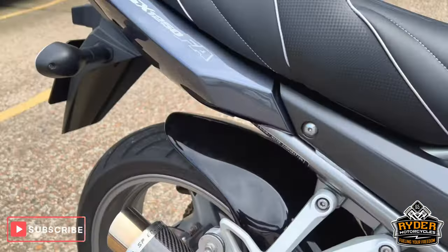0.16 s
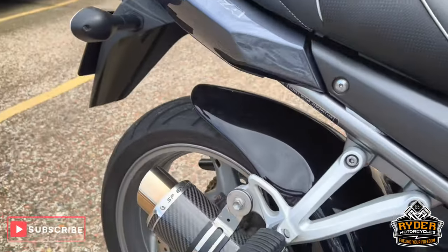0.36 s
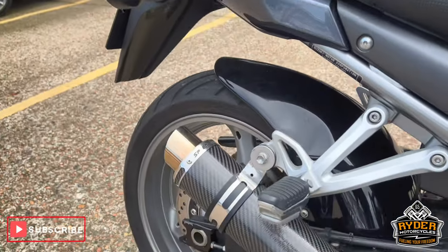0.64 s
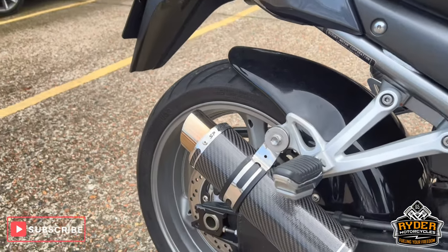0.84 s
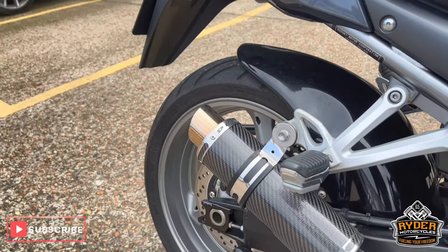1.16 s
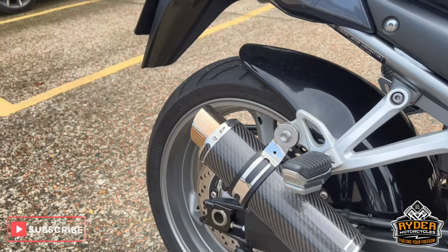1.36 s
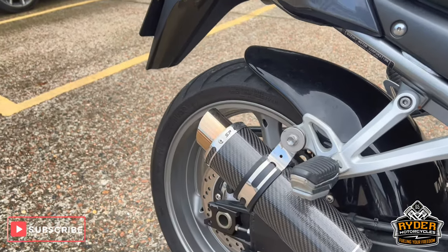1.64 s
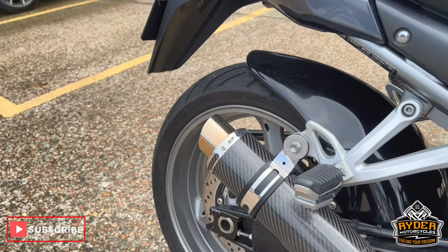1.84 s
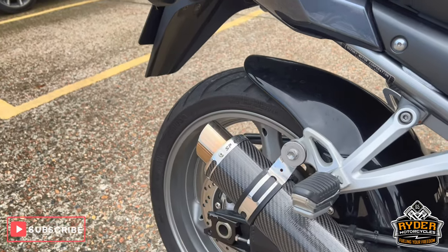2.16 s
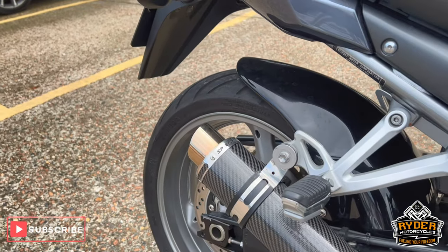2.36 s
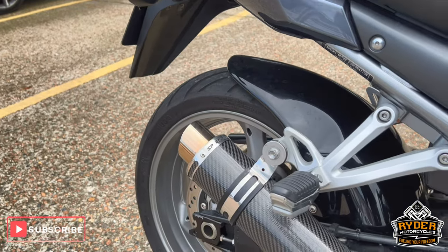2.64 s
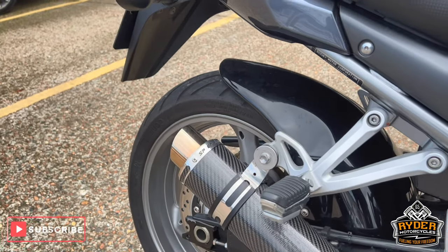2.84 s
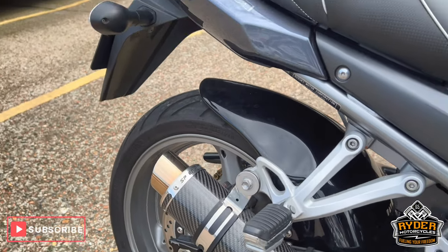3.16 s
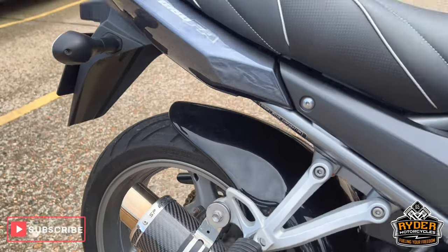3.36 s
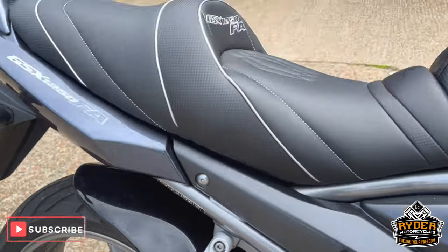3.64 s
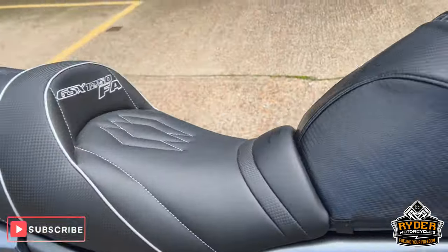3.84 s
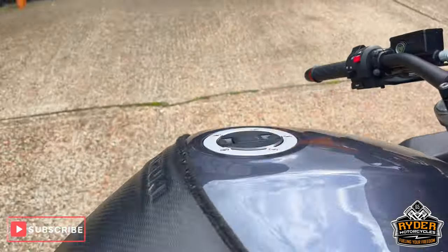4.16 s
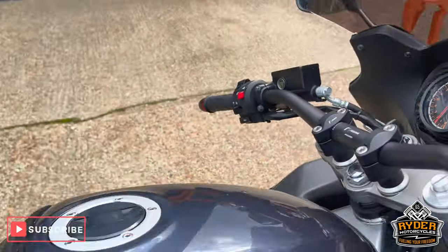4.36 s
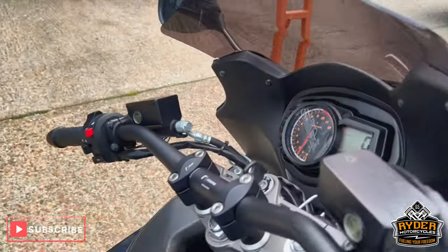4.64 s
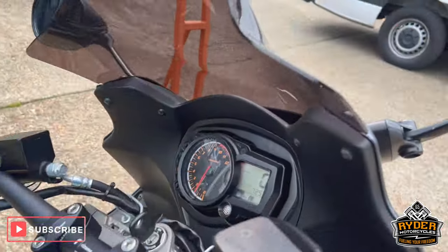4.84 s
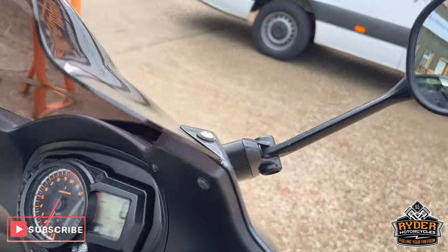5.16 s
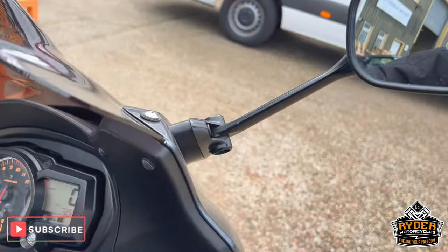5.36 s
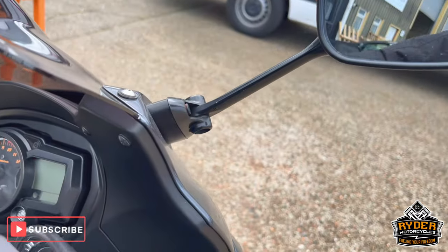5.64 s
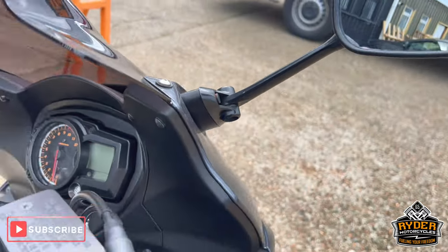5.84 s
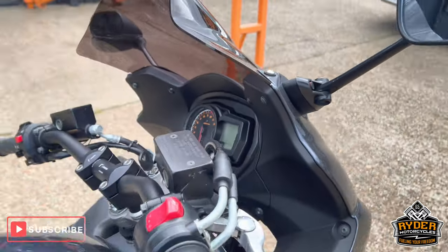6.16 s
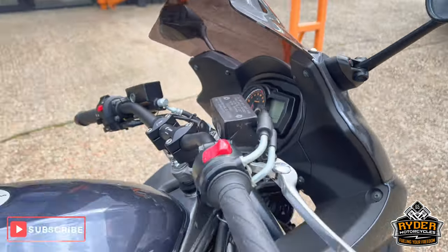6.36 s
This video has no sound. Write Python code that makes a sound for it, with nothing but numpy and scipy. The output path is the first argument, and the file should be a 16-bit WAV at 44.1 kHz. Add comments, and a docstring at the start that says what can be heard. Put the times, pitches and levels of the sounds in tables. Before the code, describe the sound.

A phone held outdoors beside a motorcycle silencer hears a low, slightly uneven four-cylinder idle, with fine valve ticking and chain noise. From 0 to 0.9 s wind rumbles and slaps the microphone. At 1.3 s the throttle snaps open: a fast rising, raspy bark to 1.5 s, with one tiny stumble, then dull thuds and a round pumping note gliding down with gear chirps. Gusts buffet again from 1.9 to 2.6 s as it settles. At 2.7 s a second, slightly higher blip barks until 2.9 s, thuds and runs down towards idle by about 4.5 s. Around 3.9-4.1 s soft air swishes accompany the move forward; the exhaust turns distant and bassy. Wind flutters at 5-5.5 s. At 5.5 s the engine stops almost instantly. Clicks and dull bumps cluster until 6 s, with a faint tiny motor whine near 5.9-6.05 s, then near quiet and a final click and bump at 6.4 s.

```python
"""Outdoors, a phone held close beside the silencer of a four-cylinder motorcycle hears it idle in gusty wind.
Firing pulses ring exhaust resonances, noise and ticks make the valve train, tones locked to speed the gears.
Two blips of the throttle each bark, then run down to idle with thuds and a round pumping note.
The phone then swings forward to the handlebar with soft swishes, and the engine falls silent.
Last come clicks, bumps and a faint motor; shaped noise makes the wind throughout and the quiet yard behind."""
import sys
import numpy as np
from scipy import signal
from scipy.fft import rfft, irfft, next_fast_len
from scipy.io import wavfile
from scipy.ndimage import uniform_filter1d

SR = 44100
rng = np.random.default_rng(int(sys.argv[2]) if len(sys.argv) > 2 else 0)


def master_out(mix):
    """Clip the mix to full scale and print it as 16-bit PCM to the path in sys.argv[1]."""
    frames = np.transpose(np.atleast_2d(mix))
    ceiling = np.clip(frames, -1, 1)
    pcm = np.round(ceiling * 32767).astype(np.int16)
    wavfile.write(sys.argv[1], SR, pcm)


N = 286209
T = np.arange(N) / SR  # seconds

ENGINE_OFF_S = 5.5


def engine():
    """All engine sounds follow one crankshaft, whose speed hunts a little."""
    hz = speed() + .6 * walk(25)
    turns = .6 + np.cumsum(hz) / SR  # firing phase, one whole turn per firing
    age = turns % 1 / hz  # seconds since the last firing
    stopped = np.maximum(T - ENGINE_OFF_S, 0)
    exhaust_fade = np.exp(-stopped / 0.0057)
    machine_fade = np.exp(-stopped / 0.035)
    return exhaust(turns, hz, age) * exhaust_fade + machinery(turns, hz, age) * machine_fade


# Twists of the throttle. Each row: opens in seconds, shuts in seconds, firing rate aimed for in Hz,
# bark under load in dB, bark just after shutting in dB.
BLIPS = [(1.314, 1.507, 168.8, -10.5, -23.5), (2.731, 2.918, 191.8, -10, -22)]
# Idle speed. Each row: time in seconds, firings per second in Hz.
IDLE = [(0, 40.13), (1, 39.18), (1.3, 40.99), (2.4, 39.48), (2.7, 40.8), (4.8, 37.54)]
COAST_S, FLYWHEEL_S = .8, .04  # time constant of the run-down; smoothing of changes in speed
FRICTION_HZ = 45  # steady friction, as the speed at which drag would equal it
# the idle control holds the speed up for a moment at a set delay after each blip
CATCH_HZ, CATCH_DELAY_S, CATCH_WIDTH_S = 11.5, .79, .28


def speed():
    """Firing rate: a steady climb on open throttle, then drag and friction slow it back to idle."""
    idle, revs, catch = curve(IDLE), 0, 0
    for opens, shuts, peak_hz, _, _ in BLIPS:
        climb = (idle + (peak_hz - idle) * ramp(opens, shuts - opens)) * (T > opens)
        run_down = np.exp(-np.maximum(T - shuts, 0) / COAST_S)
        revs = np.maximum(revs, (climb + FRICTION_HZ) * run_down - FRICTION_HZ)
        catch = catch + CATCH_HZ * swell(shuts + CATCH_DELAY_S, CATCH_WIDTH_S)
    # a smooth maximum of idle and revs
    caught = ((idle + catch) ** 8 + revs ** 8) ** (1 / 8)
    return uniform_filter1d(caught, int(FLYWHEEL_S * SR))


MISFIRE_S, MISFIRE_WIDTH_S, MISFIRE_DB = 1.5, 0.0052, -16  # one charge fails to burn in the first blip


def exhaust(turns, hz, age):
    """The outlet gives a soft boom, a hard bark on the throttle and a ringing pipe on the run-down."""
    # share of the sound in which pumping replaces firing
    above_idle = np.clip((hz - 43) / (57 - 43), 0, 1)
    overrun = .88 * np.clip(coasting(), 0, 1) * above_idle
    boom = undb(-2.0) * soft_boom(turns, hz, age, overrun) * boom_gain(hz)
    bark = hard_bark(turns, hz, age, overrun) * bark_gain(hz)
    misfire = undb(MISFIRE_DB * swell(MISFIRE_S, MISFIRE_WIDTH_S))
    return (boom + bark + pipe_ring(hz, age)) * misfire


# Silencer resonances under soft pulses. Each row: centre in Hz, width in Hz, relative level in dB.
SILENCER = [(77, 10.4, 1), (117.3, 20.5, 0.5), (198.7, 49.5, -4), (300.6, 104, -10.5), (500, 130, -21.5),
            (1120, 290, -34)]


def soft_boom(turns, hz, age, overrun):
    """Soft pulses and gas turbulence ring the silencer, and pumping replaces them on the overrun."""
    turbulence = undb(-9 - 7 * throttle()) * noise() * (1 + np.exp(-age / .004)) * np.sqrt(hz / SR)
    drive = firings(turns, scatter_db=1.3, jitter=.024) + turbulence
    boom = 0
    for k, (centre, width, db) in enumerate(SILENCER):
        boom = boom + undb(db) * resonate(drive, centre, width) * (-1) ** k
    boom = colour(boom, [(22, -60.5), (45, 20.5), (70, 1), (450, -2.5), (900, -4.5), (3000, -8.5)])
    # further forward the bike shades the outlet: the pulses arrive by detours, rounded and mostly bass
    shaded = colour(boom, [(160, -0.5), (280, -2), (400, -5.5), (600, -15), (1200, -4.5)])
    shaded = disperse(disperse(shaded, hz=290, width_hz=55), hz=400, width_hz=80)
    shade = np.clip(2 * forward_place(), 0, 1)
    boom = (1 - shade) * disperse(boom, hz=354, width_hz=125) + shade * shaded
    return (1 - overrun) * steady(boom, turns) + overrun * pumping(turns, hz)


# Spectrum of the hard pulses. Each row: frequency in Hz, relative level in dB.
BARK = [(60, -29), (150, -14.5), (240, 1.5), (320, 8), (480, 1.5), (590, -11), (700, -6), (950, -19.5),
        (1130, -9.5), (1400, -22), (2000, -26.5), (3000, -25), (6000, -56), (12000, -47)]


def hard_bark(turns, hz, age, overrun):
    """Hard pulses, each followed by a jet of gas, which keep only a raspy top on the overrun."""
    pulses = colour(firings(turns, scatter_db=1, jitter=.0015), BARK)
    hard = steady(brighten(disperse(pulses, hz=307, width_hz=380), hz), turns)
    jet = colour(noise() * np.exp(-age / 0.0029), BARK)
    jet = colour(jet, [(300, -8.0), (1000, -3.0), (4000, 1.0)])
    jet_share = undb(-20 + 15 * overrun)
    bark = (hard + jet_share * steady(jet, turns)) / np.hypot(1, jet_share)
    rasp = colour(bark, [(350, -18), (600, -7), (900, 0)])
    # near the top of a blip the pulses steepen into a brassy edge
    edge = colour(hard, [(600, -35), (1100, -13), (1550, -1), (2200, 1), (3200, -12), (5000, -25)])
    edge_share = throttle() * np.clip((hz - 90) / 60, 0, 1)
    return (1 - overrun) * bark + overrun * rasp + edge_share * edge


def pipe_ring(hz, age):
    """Gas keeps ringing one pipe resonance as the engine slows."""
    ring = unit(resonate(noise() * np.exp(-age / 0.008), 1230, 150))
    return ring * undb(-47.0 + 10 * np.log2(hz / 150)) * coasting() * (1 - forward_place())


# Pumping harmonics on a shut throttle. Each row: multiple of the firing rate, relative level in dB.
PUMPING = [(1, 3), (2, -13), (3, -15.5), (4, -21), (5, -26), (6, -33), (7, -26.5)]
# Gain of the pipe those harmonics glide through. Each row: frequency in Hz, gain in dB.
PIPE = [(50, -1.5), (100, -1.5), (175, 0), (225, -6), (245, -4), (275, 8), (325, 6), (365, -3), (430, -1),
        (490, 3), (570, -9), (680, -5), (900, -15)]


def pumping(turns, hz, db=-1):
    """On a shut throttle the pistons mostly pump air: a round, uneven gliding note over rushing gas."""
    note = 0
    for k, level_db in PUMPING:
        level = undb(level_db + across(PIPE, k * hz) + 1.8 * walk(18))
        note = note + level * np.cos(2 * np.pi * k * turns)
    uneven = 1 + .08 * np.cos(np.pi * turns / 2) + .11 * walk(150)
    gas = colour(noise(), [(30, -30), (60, -3), (150, 0), (320, 0), (520, -7), (750, -20), (1500, -40)])
    return undb(db) * (note * uneven + undb(-16) * unit(gas))


# Strength of each cylinder. Listed in firing order: relative level in dB.
CYLINDERS = [-2.2, -1, -1.5, -3.8]


def firings(turns, scatter_db, jitter):
    """One pulse per whole turn of firing phase, with random strength and a shift in shares of a period."""
    place = np.interp(np.arange(1, int(turns[-1])), turns, np.arange(N))
    count = len(place)
    size = undb(np.resize(CYLINDERS, count) + scatter_db * noise()[:count])
    place = np.clip(place + jitter * np.gradient(place) * noise()[:count], 0, N - 1)
    # share each pulse between two samples, so that it can fall between them
    pulses, sample = np.zeros(N + 1), place.astype(int)
    pulses[sample] += size * (1 - place % 1)
    pulses[sample + 1] += size * (place % 1)
    return pulses[:N]


def steady(x, turns, count=3):
    """Hold the rms near 1 over a few firings, so that the gains set the loudness."""
    energy = np.cumsum(x ** 2)
    start = np.interp(turns - count / 2, turns, np.arange(N))
    end = np.interp(turns + count / 2, turns, np.arange(N))
    power = (energy[end.astype(int)] - energy[start.astype(int)]) / (end - start)
    return x / np.sqrt(power + np.mean(x ** 2) / 10 ** 2)


def brighten(x, hz, dull_hz=80, bright_hz=165):
    """Pulses steepen as the engine speeds up, so the treble grows."""
    steep = np.clip((hz - dull_hz) / (bright_hz - dull_hz), 0, 1)
    dull = colour(x, [(450, 6.5), (1000, -5.5), (2500, -9.0)])
    bright = colour(x, [(300, 1.5), (500, 7.5), (900, 8.5), (1600, 9.5), (2600, -5.5), (4000, 1.0)])
    return (1 - steep) * dull + steep * bright


def disperse(x, hz, width_hz):
    """All-pass: a pipe holds back the sound near its resonance, which spreads pulses into short rings."""
    return x - 2 * resonate(x, hz, width_hz)


# Spectrum of chains, valves and rushing gas. Each row: frequency in Hz, relative level in dB.
MACHINE = [(200, 12.5), (600, 11.5), (1100, 9.5), (1700, 4.5), (2300, 1), (3300, 0.5), (4200, -3.5),
           (5500, -6), (7300, -7), (8800, -5), (9600, -10), (10300, -29.5), (12000, -18), (15500, -37)]


def machinery(turns, hz, age):
    """Chain and gas noise swell with each firing, valves tick, and the gears whine along with the speed."""
    forward = forward_place()
    rush = noise() * (1 + .8 * np.exp(-age / 0.0043)) * undb(1.54 * walk(70))
    rush = unit(colour(rush, MACHINE))
    # further forward the tank hides the valves, and the gears and chains come closer
    ticks = noise() * np.exp(-age / .004) * undb(4 * np.tanh(walk(45)))
    ticks = resonate(resonate(ticks, 3180, 750), 3200, 2200)
    valve_db = 3 - 40 * forward - 5 * coasting() - 10 * gulp()
    valves = unit(ticks) * np.clip(45 / hz, 0, 1) * undb(valve_db)
    chains = undb(-1 + 6.2 * np.tanh(walk(25))) * forward * unit(resonate(rush, 2100, 650))
    rush = undb(11.0 + 1.0 * forward) * rush
    return (rush + valves + chains + gear_whine(turns, hz, forward)) * machine_gain(hz)


# Gear whine. Each row: multiple of the firing rate, relative level in dB.
GEARS = [(54, -0.5), (80, -14), (133, -5.5)]
# How well the engine cases radiate the whine. Each row: frequency in Hz, gain in dB.
CASES = [(1500, -10), (2100, -3), (2900, 1), (3800, -1), (5000, -10), (6500, -11), (8000, -24),
         (12000, -45)]


def gear_whine(turns, hz, forward):
    """Gear teeth sing at multiples of the firing rate, most in broken chirps as the engine settles."""
    tones = 0
    for multiple, db in GEARS:
        flutter = undb(7.5 * np.tanh(walk(35)))
        tones = tones + undb(db) * flutter * np.sin(2 * np.pi * multiple * turns + 1.6 * walk(200))
    settling = coasting() * near(hz, centre_hz=62, width=.28)
    chirps = 7 * np.tanh(2 * walk(30) - 1)
    closeness_db = 6 * np.clip(4 * forward, 0, 1)
    level_db = -1 + closeness_db - 2 * octaves(hz) + (2 + chirps) * settling - 14 * gulp()
    return colour(tones, CASES) * undb(level_db)


# The phone's place along the bike. Each row: time in seconds, place from 0 at the silencer
# to 1 at the handlebar.
FORWARD = [(3.3, 0.012), (4.3, 0.4)]


def forward_place():
    """How far forward the phone is held."""
    return np.clip(curve(FORWARD), 0, 1)


BARK_ATTACK_S, BARK_RELEASE_S, BARK_DB_PER_OCTAVE = 0.035, 0.01, 15.5


def throttle():
    """1 while the throttle is open, 0 while it is shut."""
    return sum(ramp(opens, BARK_ATTACK_S) - shutting(shuts) for opens, shuts, *_ in BLIPS)


def shutting(shuts):
    """Rises from 0 to 1 as the throttle shuts."""
    return ramp(shuts - BARK_RELEASE_S / 2, BARK_RELEASE_S)


GULP_DELAY_S, GULP_WIDTH_S = 0.026, 0.058


def gulp():
    """The first surge of charge just after each opening."""
    return sum(swell(opens + GULP_DELAY_S, GULP_WIDTH_S) for opens, *_ in BLIPS)


def coasting(length_s=1.15):
    """1 for a set time after each shutting, while the engine runs down."""
    return sum(ramp(shuts, 0.072) - ramp(shuts + length_s, 0.028) for _, shuts, *_ in BLIPS)


def octaves(hz):
    """Engine speed in octaves above idle."""
    return np.log2(hz / curve(IDLE))


def near(hz, centre_hz, width):
    """1 as the engine passes through a given speed; width in octaves."""
    return np.exp(-(np.log2(hz / centre_hz) / width) ** 2)


# Engine at the phone, reckoned at idle speed. Each row: time in seconds, exhaust boom gain in dB,
# mechanical noise gain in dB.
ENGINE = [(0, -13, -51), (1.25, -15.5, -52.5), (2.05, -12.5, -58.5), (2.4, -25.5, -59), (2.7, -19.5, -56),
          (3.35, -13, -57), (3.6, -20, -62.5), (4.2, -29, -63.5), (5.1, -28.5, -63.5)]
BOOM_DB_PER_OCTAVE, MACHINE_DB_PER_OCTAVE = 3, 5
CUT_WIDTH_S, CUT_DB = 0.019, -11


def boom_gain(hz, gulp_db=6):
    """The boom grows a little with speed, surges on opening and collapses on shutting."""
    cut = sum(swell(shuts, CUT_WIDTH_S) for _, shuts, *_ in BLIPS)
    return undb(curve(ENGINE) + BOOM_DB_PER_OCTAVE * octaves(hz) + gulp_db * gulp() + CUT_DB * cut)


def bark_gain(hz, linger_s=0.53, sag_db=-5, sag_s=0.0092):
    """The bark is full under load, sags as the grip is let go, then a weaker one dies with the speed."""
    gain = 0
    for opens, shuts, peak_hz, load_db, coast_db in BLIPS:
        shut = shutting(shuts)
        loaded = ramp(opens, BARK_ATTACK_S) ** 2 * undb(load_db + sag_db * swell(shuts, sag_s))
        after = undb(coast_db + BARK_DB_PER_OCTAVE * np.log2(hz / peak_hz))
        after = after * (1 - ramp(shuts + linger_s, 0.059))
        gain = gain + (1 - shut) * loaded + shut * after
    return gain


def machine_gain(hz, gulp_db=13, load_db=3, rattle_db=4.0):
    """Mechanical noise grows with speed and load, hisses on opening and rattles at one coasting speed."""
    rattle = coasting() * near(hz, centre_hz=111.4, width=0.055)
    level_db = curve(ENGINE, axis=2) + MACHINE_DB_PER_OCTAVE * octaves(hz)
    return undb(level_db + gulp_db * gulp() + load_db * throttle() + rattle_db * rattle)


# Dull thuds as the throttle snaps shut. Each row: start in seconds, relative level in dB.
THUDS = [(1.562, -19), (1.63, -8), (2.945, -14)]


def thuds(hz=105):
    """Late-burning mixture thumps in the silencer, as short decaying sines."""
    return sum(undb(db) * burst(s, decay_s=0.011) * np.sin(2 * np.pi * hz * (T - s)) for s, db in THUDS)


# Small clicks and knocks at the handlebar. Each row: start in seconds, relative level in dB,
# centre in Hz, rattle decay in seconds, relative level of the knock on the panel in dB.
CLICKS = [(5.564, -36, 1090, 0.0033, -26), (5.590, -43, 1400, 0.00075, -18),
          (5.600, -24, 2220, 0.00043, -23), (5.624, -39, 1800, .001, -22), (5.63, -34, 1490, 0.0009, -31),
          (5.65, -25, 1400, 0.0042, -27), (5.659, -34, 2170, .0015, -34), (5.676, -38.5, 5260, .007, -25.5),
          (5.709, -44, 3200, 0.0035, -38), (5.746, -50, 3530, 0.0044, -24.5),
          (5.751, -36, 3850, 0.00066, -23), (5.942, -48, 1290, .002, -43), (5.965, -33, 1310, 0.0033, -45),
          (5.975, -49, 1360, 0.0034, -25), (5.984, -34.5, 1250, 0.0024, -29),
          (5.999, -37, 1350, 0.0015, -37), (6.242, -49, 6000, .001, -65),
          (6.416, -26.5, 1300, 0.0009, -20.5), (6.4204, -43, 1270, .0005, -19)]


def clicks(size=4096):
    """Hard parts click: a sharp contact, a short rattle and a knock on the panel that holds them."""
    out = np.zeros(N + size)
    for s, db, hz, decay_s, panel_db in CLICKS:
        rattle = rng.standard_normal(size) * np.exp(-T[:size] / decay_s)
        strike = signal.unit_impulse(size) + .3 * rattle
        tick = resonate(resonate(strike, hz, .9 * hz), hz, .9 * hz)
        panel = resonate(resonate(strike, 500, 200), 560, 600)
        contact = signal.butter(3, min(1.7 * hz, SR / 4), fs=SR)  # low-pass
        tick = undb(db) * peak(signal.lfilter(*contact, tick))
        knock = undb(panel_db) * peak(signal.lfilter(*contact, panel))
        out[int(s * SR):][:size] += tick + knock
    return colour(out[:N], [(7500, -4), (10000, -20)])


# A small electric motor winding after the stop. Each row: time in seconds, fundamental in Hz,
# relative level in dB.
MOTOR = [(5.9, 1900, -75), (6.01, 1900, -69), (6.03, 1950, -73)]


def motor():
    """Faint whine of a small motor, on its second to fourth harmonics."""
    phase = 2 * np.pi * np.cumsum(curve(MOTOR) * (1 + 0.0049 * walk(150))) / SR
    tone = sum(undb(-7 * (k - 0.5)) * np.sin(k * phase) for k in range(2, 5))
    running = ramp(MOTOR[0][0], .01) - ramp(MOTOR[-1][0], 0.043)
    return tone * running * undb(curve(MOTOR, axis=2))


# Dull bumps of the hand on the phone. Each row: start in seconds, relative level in dB.
BUMPS = [(5.679, -22), (5.75, -21.5), (6.003, -31.5), (6.42, -25), (6.429, -22.5)]


def bumps(hz=88):
    """The phone's body thumps briefly in the hand, as short decaying sines."""
    out = 0
    for s, db in BUMPS:
        out = out + undb(db + 5.5) * burst(s, decay_s=0.0051) * np.sin(2 * np.pi * hz * (T - s))
    return out


# Spectra of the wind's rumble, buffeting and crackle at the microphone.
# Each row: frequency in Hz, relative level in dB.
RUMBLE = [(22, -46.5), (38, 1), (55, 17.5), (150, 13), (250, 2), (500, -57.5)]
BUFFET = [(25, -33.5), (60, -20), (160, -5), (300, -0.5), (480, -7), (750, -18), (1200, -36.5), (2500, -62),
          (6000, -83)]
CRACKLE = [(200, -16), (600, 0), (1100, -1), (1800, -7), (2700, -15), (4000, -27), (7000, -42),
           (12000, -65)]
# Gusts on the microphone. Each row: start in seconds, end in seconds, relative buffeting level in dB,
# then deep rumble and crackle, each in dB against the buffeting.
GUSTS = [(0, 0.132, -32.5, 7, -16.5), (0.194, 0.262, -22, -1.5, -16.5), (0.334, 0.418, -21.5, 2.5, -18.5),
         (0.451, 0.878, -28, 3.5, -24), (1.911, 2.302, -29.5, 9.5, -18), (2.315, 2.65, -34.5, 9.5, -24.5),
         (3.557, 3.824, -32, 4, -21), (3.819, 4.083, -31, -3.5, -19), (4.096, 4.22, -40.5, 5, -13),
         (4.432, 4.494, -43.5, 7.5, -22), (4.987, 5.184, -35, 7.5, -27), (5.185, 5.487, -34, 8, -21.5),
         (5.529, 5.72, -39, 1, -16), (5.723, 6.18, -48, 2.5, -26), (5.964, 6.019, -44, -4, -23),
         (6.363, 6.487, -46, 3, -22.5)]
GUST_ATTACK_S, GUST_RELEASE_S = 0.0055, 0.029


def wind():
    """Turbulence on the microphone: gusts of rumble, buffeting and crackle flicker in quick eddies."""
    eddies = np.tanh(walk(90))
    rumble = unit(colour(noise() * undb(2 * eddies), RUMBLE))
    buffet = unit(colour(noise() * undb(4.0 * eddies + 2 * walk(400)), BUFFET))
    grain = undb(6 * eddies + 4 * np.tanh(walk(600)))
    crackle = unit(colour(noise() * grain, CRACKLE))
    out = 0
    for start, end, db, rumble_db, crackle_db in GUSTS:
        fall = np.exp(-np.clip(T - end, 0, 1) / GUST_RELEASE_S)
        envelope = undb(db) * ramp(start, GUST_ATTACK_S) * fall
        out = out + envelope * (buffet + undb(rumble_db) * rumble + undb(crackle_db) * crackle)
    return undb(2) * out


# Single eddies that slap the microphone. Each row: start in seconds, relative level in dB,
# crackle in dB added to that level.
SLAPS = [(0.08, -14, -15.5), (0.195, -12.5, -17), (0.231, -14.5, -8), (.406, -7, -29),
         (0.488, -14.5, -19.5), (0.525, -18.5, -11), (0.546, -12.5, -22), (0.591, -18, -6.5),
         (.697, -14.5, -26), (0.771, -24, -31), (0.864, -28.5, -28), (1.952, -12, -39), (2.136, -15, -14.5),
         (2.194, -38, -27), (2.282, -16.5, -7), (2.305, -19, -14), (2.44, -12.5, -33.5),
         (2.532, -19.5, -9.5), (2.632, -18.5, -21.5), (3.613, -36.5, -36.5), (5.077, -31, -26),
         (5.101, -25.5, -12.5), (5.213, -33.5, 1.5), (5.247, -18.5, -13.5), (5.285, -17.5, -13.5),
         (5.37, -29.5, -1.5), (5.413, -23, -33), (6.375, -32.5, -23.5)]


def slaps():
    """Single strong eddies: a kick of pressure, a short tumble of air and a crackling edge."""
    kicks, tumble, edge = np.zeros(N), 0, 0
    for s, db, crackle_db in SLAPS:
        kicks[int(s * SR)] = undb(db)
        tumble = tumble + undb(db) * burst(s, decay_s=0.011)
        edge = edge + undb(db + crackle_db) * burst(s, decay_s=0.0028, rise_s=0.000074)
    kicks = colour(kicks, BUFFET) / np.max(np.abs(colour(signal.unit_impulse(N), BUFFET)))
    tumble = tumble * unit(colour(noise(), BUFFET))
    edge = edge * unit(colour(noise(), CRACKLE))
    return undb(3.0) * kicks + undb(-2.5) * tumble + undb(1.5) * edge


# Smooth swishes as the phone swings. Each row: centre in seconds, level in dB, half-width in seconds.
SWISHES = [(3.92, -40.5, .1), (4.02, -37, .045)]


def swishes():
    """Air streams evenly past the ports while the phone moves fast."""
    envelope = sum(undb(db) * swell(s, width_s) for s, db, width_s in SWISHES)
    return envelope * unit(colour(noise(), CRACKLE))


# Left minus right at the two microphone ports. Each row: frequency in Hz, difference in dB.
PORT_BALANCE = [(60, -0.5), (110, 2.5), (200, 4), (380, 2.5), (700, 4.5), (1290, 5.5), (2380, -1),
                (4400, 4.5), (8120, 1), (15000, 0)]
# Lead of the left port. Each row: frequency in Hz, phase in radians.
PORT_PHASE = [(60, 0.36), (250, 0.17), (700, 0.15), (2000, 1.32), (4000, 1.2), (8000, 1.08), (15000, 2.4)]


def ports(x, size=2048):
    """Two microphone ports hear a near source with different level and phase."""
    padded = np.pad(x, size, mode="reflect", reflect_type="odd")
    length = next_fast_len(len(padded))
    freqs = np.arange(length // 2 + 1) * SR / length
    # each port takes half of the difference
    half = undb(across(PORT_BALANCE, freqs) / 2) * np.exp(.5j * across(PORT_PHASE, freqs))
    return irfft(rfft(padded, length) * np.array([half, 1 / half]), length)[:, size:size + N]


def yard(x, t60_s=.075, size=16384):
    """Faint scatter from the ground, the bike and nearby walls, different on each side."""
    tail = rng.standard_normal((2, size)) * undb(-60 * T[:size] / t60_s)
    tail /= np.sqrt(np.sum(tail ** 2, axis=1, keepdims=True))
    scattered = colour(x, [(100, -13.0), (500, -8.0), (1500, -4.0), (4000, -12.0), (9000, -15.5)])
    return signal.fftconvolve(scattered[None], tail, axes=1)[:, :N]


# Spectrum of the distant surroundings. Each row: frequency in Hz, relative level in dB.
OUTDOORS = [(20, -5.5), (70, -2.5), (200, -26.5), (550, -23.5), (1200, -34), (4000, -54.5), (9000, -53),
            (15000, -80)]
OUTDOORS_DB = -49.5


def surroundings():
    """Steady coloured noise from afar, independent at each port."""
    return np.array([unit(colour(noise(), OUTDOORS)) for _ in range(2)]) * undb(OUTDOORS_DB)


def undb(db):
    """Decibels to gain."""
    return 10 ** (np.asarray(db) / 20)


def unit(x):
    """Scale to rms 1."""
    return x / np.sqrt(np.mean(x ** 2))


def peak(x):
    """Scale to a peak of 1."""
    return x / np.max(np.abs(x))


def curve(rows, axis=1):
    """One column of a table, joined by straight lines in time."""
    rows = np.array(rows)
    return np.interp(T, rows[:, 0], rows[:, axis])


def across(points, freqs):
    """Values of (Hz, value) points on a log-frequency axis."""
    hz, value = np.transpose(points)
    return np.interp(np.log(np.maximum(freqs, 1)), np.log(hz), value)


def colour(x, points, size=4096):
    """Causal minimum-phase filter with the given (Hz, dB) spectrum, so that attacks stay sharp."""
    gain = undb(across(points, np.linspace(0, SR / 2, size // 2 + 1)))
    cepstrum = irfft(np.log(gain))
    # folding the cepstrum forward makes the response causal
    cepstrum[1:size // 2] *= 2
    cepstrum[size // 2 + 1:] = 0
    return signal.fftconvolve(x, irfft(np.exp(rfft(cepstrum))))[:N]


def resonate(x, hz, width_hz):
    """One resonance with gain 1 at its centre."""
    return signal.lfilter(*signal.iirpeak(hz, max(hz / width_hz, .5), fs=SR), x + 1e-18)


def noise():
    """White noise."""
    return rng.standard_normal(N)


def walk(rate):
    """Smooth random wandering with an rms of 1, drawn anew at the given rate in Hz."""
    hold = max(int(SR / rate), 1)
    steps = np.repeat(noise()[:N // hold + 1], hold)
    return unit(uniform_filter1d(steps, hold)[:N])


def burst(start_s, decay_s, rise_s=0.00088):
    """Envelope with a quick rise and an exponential fall."""
    age = np.clip(T - start_s, 0, 20 * decay_s)
    return (1 - np.exp(-age / rise_s)) * np.exp(-age / decay_s)


def swell(centre_s, width_s):
    """A smooth bump of height 1."""
    return np.exp(-((T - centre_s) / width_s) ** 2)


def ramp(start_s, length_s):
    """A straight rise from 0 to 1."""
    return np.clip((T - start_s) / length_s, 0, 1)


def scene():
    """The bike, the wind on the microphone and the quiet surroundings."""
    bike = engine() + clicks() + motor()
    near_sounds = bike + thuds() + bumps() + wind() + slaps() + swishes()
    # small eddies reach each port differently
    between_ports = undb(-16) * wind() * np.array([[1], [-1]])
    return ports(near_sounds) + between_ports + yard(bike) + surroundings()


TOP_HZ = 15800


def record(dry):
    """The phone rounds the loudest peaks and cuts the top."""
    rounded = np.tanh(.95 * dry) / .95
    return signal.sosfilt(signal.ellip(8, .2, 70, TOP_HZ, fs=SR, output="sos"), rounded)


dry = scene()
out = record(dry)
master_out(out)
```